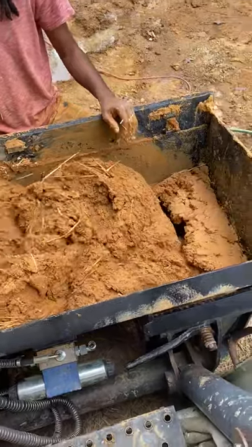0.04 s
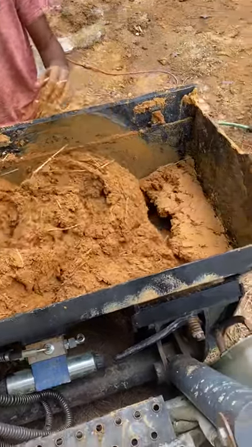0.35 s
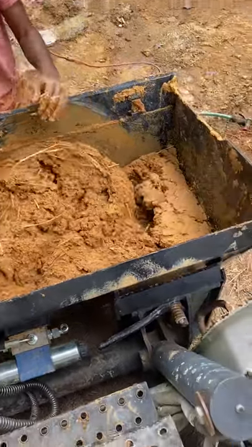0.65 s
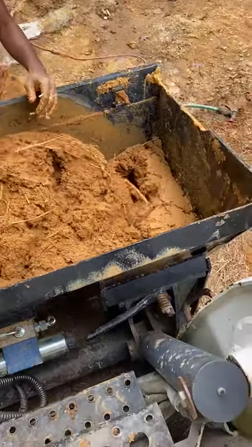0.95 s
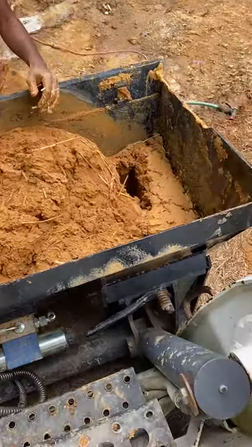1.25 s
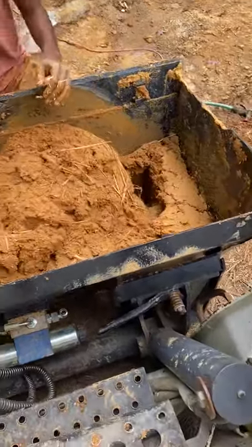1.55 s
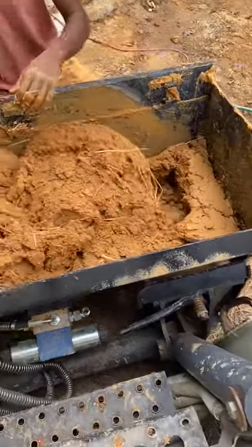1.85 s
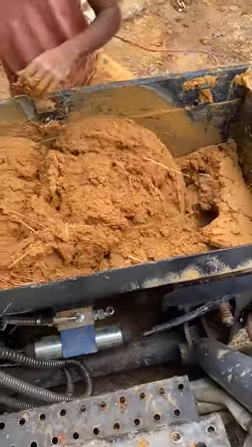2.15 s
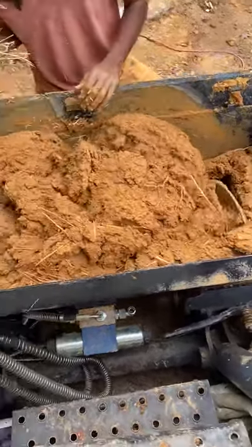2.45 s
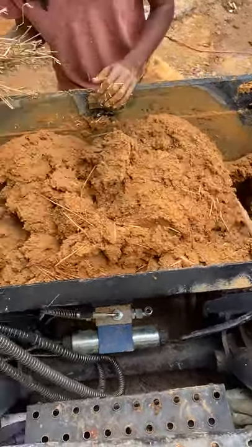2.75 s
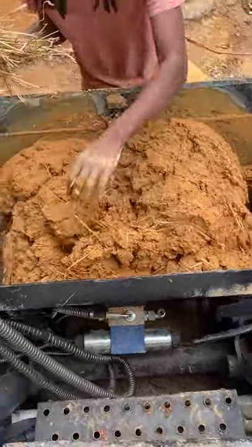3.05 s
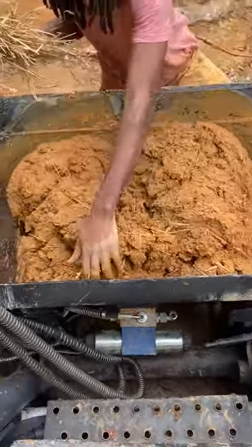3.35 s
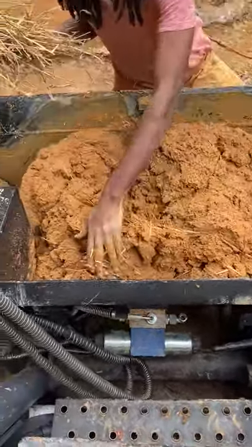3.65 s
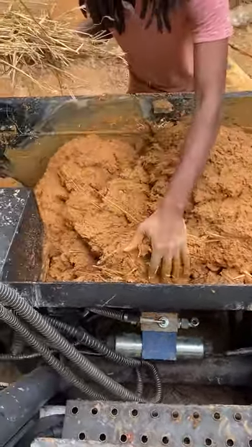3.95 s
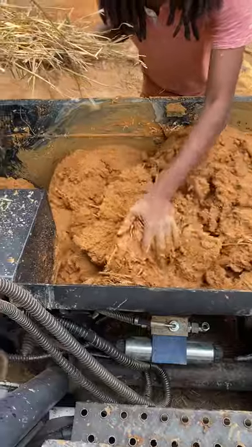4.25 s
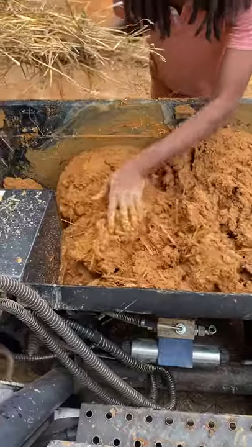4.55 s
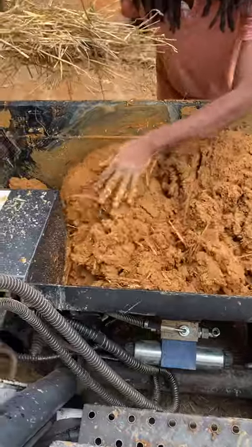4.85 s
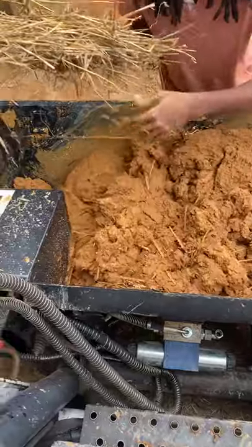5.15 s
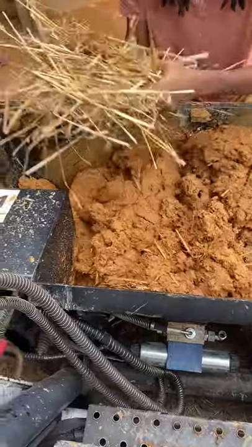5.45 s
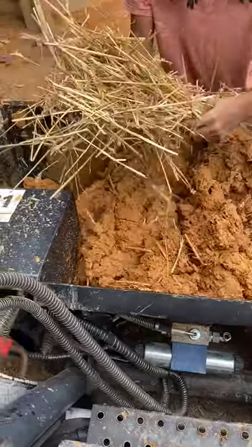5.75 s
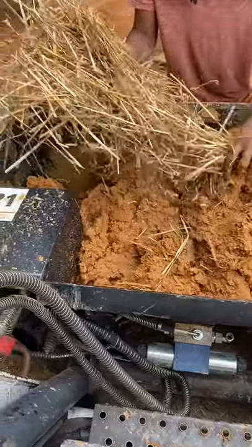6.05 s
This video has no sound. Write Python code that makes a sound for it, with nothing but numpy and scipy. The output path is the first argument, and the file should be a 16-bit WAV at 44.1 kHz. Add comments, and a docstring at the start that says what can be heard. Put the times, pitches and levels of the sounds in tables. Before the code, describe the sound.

Heard up close from the cab of a heavy machine outdoors, a diesel engine drones and rattles without changing speed. The mixer it drives shudders and booms about once a second as it turns heavy clay, most strongly around halfway, followed by a short run of dull knocks on the steel bucket. A wavering pump whine, faintly ringing metal covers and a soft airy hiss continue all the way through.

```python
"""Skid steer mixing wet clay

Outdoors, from the cab, on a phone that swings from the side of the mixer bucket to its middle.
The four-cylinder diesel holds about 1500 rpm: firings throb and rumble in the exhaust, the block
clatters, the steel covers ring. Cooling fan and hydraulic pump whine over a rush of air, and the
steel bucket booms each time the paddles take up load."""
import sys
import numpy as np
from scipy import signal
from scipy.fft import rfft, irfft
from scipy.io import wavfile
from scipy.ndimage import uniform_filter1d, minimum_filter1d

SR = 44100
rng = np.random.default_rng(int(sys.argv[2]) if len(sys.argv) > 2 else 0)


def dump(signal):
    """Clip the signal to [-1, 1] and save it as 16-bit WAV at the path in sys.argv[1]."""
    limited = np.clip(np.atleast_2d(signal).T, -1, 1)
    pcm = np.round(limited * 32767).astype(np.int16)
    wavfile.write(sys.argv[1], SR, pcm)


N = 273861
T = np.arange(N) / SR
BINS = np.arange(N // 2 + 1) * SR / N + 0.00074  # Hz, kept off zero for the logarithm

FIRING_HZ = 50.21  # two firings to a turn of the crankshaft
FAN_RATIO, PUMP_RATIO = .723654, 5.8083  # fan turns and pump strokes per firing
IN_STEP_AGO_S = 2.65  # engine, fan and pump were in step this long ago; sets when their beats swell
SWING_START_S, SWING_END_S = 0.97, 3.6

# rush of air and oil, before its gain: f/Hz, density/(dB per Hz)
AIR_SPECTRUM = [(300, -80), (1300, -73), (2650, -67.5), (3100, -71.5), (3700, -70.8), (4100, -71.6),
                (4600, -70.7), (5200, -71.8), (5600, -74), (6500, -73.9), (7100, -78.8), (8100, -78.2),
                (9000, -79.4), (10600, -80.1), (11600, -78.3), (12200, -79.2), (13600, -84.7),
                (15600, -83.3)]
# faint whistles in the hiss: middle t/s, half length/s, f/Hz, width/Hz, level/dB
AIR_WHISTLES = [(1.05, .45, 10100, 200, -51.5), (1.15, .55, 8570, 200, -52.5), (1.1, 1.2, 3750, 450, -46.5),
                (2.25, .3, 5250, 450, -48.5), (2.2, .22, 9150, 250, -54.5), (2.55, .3, 12100, 250, -54.5),
                (3.3, .6, 11470, 140, -53.5), (3.2, .45, 3710, 80, -49), (3.35, .52, 5150, 130, -49.5),
                (3.0, .25, 8060, 150, -55), (3.05, .25, 10080, 150, -56), (3.95, .25, 10820, 250, -54),
                (5.3, .9, 6210, 140, -52), (5.9, .55, 10150, 220, -54.5), (6.1, .3, 11880, 200, -54)]
# modes of the steel covers: f/Hz, level/dB, loudest t/s, half length/s, left minus right/dB
COVER_RINGS = [(697, -41.5, 1.9, 0.92, 14), (842, -39, 4.1, 1.4, 12), (1274, -48, 0.98, 1.7, 4),
               (1457, -42, 1, 0.81, 5), (1550, -46.5, 2.6, .8, 13), (1747, -42.5, 0.74, 0.72, -1),
               (1951, -43.5, 6, 10, -2), (2150, -44, 4.5, 2.2, -2), (2370, -43, 3.3, 0.99, -1),
               (2498, -45.5, 1.8, 1.3, -11), (2785, -46, 4.1, 1.6, -2), (3120, -55, 1, 1.2, -2)]
# the fan's blade tone and its octave: multiple of the blade rate, level/dB before and after the swing
BLADE_TONES = [(1, -29, -34.5), (2, -31, -36.5)]
# weaker tones of the unevenly spaced blades: multiple of the fan shaft rate, level/dB
FAN_SHAFT_TONES = [(2, -34.5), (6, -36), (7, -45), (8, -44.5), (16, -36), (20, -44), (22, -52), (26, -40.5)]
# the pump's hum: t/s, level/dB
PUMP_LEVELS = [(0, -38), (.6, -32), (1.2, -34.5), (1.7, -25), (2.1, -33), (2.6, -23.5), (3.1, -31.5),
               (3.9, -22), (4.7, -26.5), (5.6, -20.5), (6.2, -27)]
# the pump's overtones: multiple of the stroke rate, level/dB before and after the swing
PUMP_OVERTONES = [(2, -37, -35), (3, -27, -38.5)]
# clatter of the engine block: f/Hz, density/(dB per Hz)
BLOCK_SPECTRUM = [(200, -65.5), (380, -53.5), (600, -53.5), (730, -51), (800, -54.5), (865, -52),
                  (930, -59), (1030, -57.5), (1120, -62), (1480, -62.5), (1680, -66), (2400, -68),
                  (3100, -74), (9000, -105)]
# exhaust rumble, before its gain: f/Hz, density/(dB per Hz)
EXHAUST_SPECTRUM = [(20, -88), (35, -73), (60, -52.5), (80, -45), (110, -47.5), (138, -44.5), (157, -48),
                    (185, -44), (215, -46), (238, -50), (260, -46), (300, -46.5), (335, -57.5), (600, -69),
                    (2000, -120)]
# slow drift of the rumble: t/s, gain/dB
RUMBLE_GAINS = [(0, 2.5), (2.4, 1), (3.5, 1.5), (4.4, -0.1), (5.3, 0.5), (6.2, 0.5)]
# engine tones: multiple of the four-firing cycle rate, level/dB
ENGINE_TONES = [(4, -19.5), (8, -22.5), (9, -48), (12, -37.5), (13, -37.5), (16, -30), (20, -41), (44, -46),
                (48, -38.5), (52, -40.5), (64, -44), (76, -53), (80, -52), (84, -50)]
# dull knocks on the bucket: t/s, f/Hz, level/dB
BUCKET_KNOCKS = [(3.704, 165, -9.5), (3.971, 705, -14), (4.131, 790, -8.5), (4.229, 580, -10)]
# high whines of the mixer drive and the hydraulic pump: f/Hz, level/dB
HIGH_WHINES = [(844, -48.5), (1749, -51.5), (2100, -52)]
# low hum of the mixer drive: t/s, level/dB
DRIVE_LEVELS = [(0, -28), (.35, -32), (1.1, -56), (2.3, -28), (2.8, -37), (3.8, -27), (4.1, -38),
                (4.8, -41), (5.25, -26), (5.6, -44), (6.2, -38)]
# paddles digging into the clay, with lighter catches between: full load t/s, half length/s, level/dB
PADDLE_LOADS = [(.3, 0.33, -17.3), (1.16, 0.11, -18.5), (1.89, 0.42, -16.7), (3.26, 0.24, -12.5),
                (3.7, .17, -21.5), (4.22, .06, -20), (4.84, 0.33, -16), (6.2, 0.17, -14.5)]
# the machine at the phone's two microphones: f/Hz, likeness (0-1), left minus right/dB
MACHINE_AT_MICS = [(100, 1, 0), (170, .999, .1), (330, .97, .9), (600, .92, .5), (940, .87, 2),
                   (1400, .66, 2.8), (1900, .8, -1), (2400, .55, -2), (4400, .3, -1)]
# the hiss at the two microphones: f/Hz, likeness (0-1), left minus right/dB, lag on the right/s
HISS_AT_MICS = [(3000, .65, -1, .00019), (3600, .75, -1, .00029), (4500, .65, -2, .00026),
                (5100, .8, 0, .00021), (7000, .9, 0, .00021), (9000, .82, 0, .000195),
                (15000, .8, 0, .000185)]


def undb(db):
    """Decibels to gain."""
    return 10 ** (np.asarray(db) / 20)


def over_time(table):
    """A table's level, joined by straight lines in time."""
    return np.interp(T, *np.transpose(table))


def over_bins(table):
    """Each column of a table, joined by straight lines in log frequency."""
    hz, *columns = np.transpose(table)
    return [np.interp(np.log(BINS), np.log(hz), column) for column in columns]


def swing(before_db, after_db):
    """A level that glides from one value to another while the phone swings round."""
    return np.interp(T, [SWING_START_S, SWING_END_S], [before_db, after_db])


def colour(white, spectrum):
    """Give white sound of unit power a spectrum in dB per Hz."""
    return irfft(rfft(white) * undb(over_bins(spectrum)[0]) * np.sqrt(SR / 2), N)


def walk(rate_hz):
    """Random drift with unit spread, changing about rate_hz times a second."""
    drift = irfft(rfft(rng.standard_normal(N)) * np.exp(-(BINS / rate_hz) ** 2), N)
    return (drift - drift.mean()) / drift.std()


def tone(cycles, db, waver):
    """A sine at an rms level; moving air and uneven running make it waver in size and phase."""
    wobble = 1 + waver * (walk(4.6) + 1j * walk(4.1))
    return np.sqrt(2) * undb(db) * (wobble * np.exp(2j * np.pi * cycles)).imag


def ring(push, hz, width_hz):
    """One mode with steep skirts, ringing under a push, at unit level."""
    mode = irfft(rfft(push) / (1 + 2j * (BINS - hz) / width_hz) ** 2, N)
    return mode / mode.std()


def puffs(cycles, decay_cycles, scatter_db, steady):
    """Noise, direct and scattered, that flares unevenly once a cycle above a steady floor."""
    count = cycles.astype(int)
    size = undb(scatter_db * rng.uniform(-1, 1, 4096))[count]
    envelope = steady + size * np.exp(-(cycles - count) / decay_cycles)
    return rng.standard_normal((2, N)) * envelope / np.sqrt(np.mean(envelope ** 2))


def recurring(firings):
    """Noise, direct and scattered, that is the same in every cycle of four firings."""
    loop = rng.standard_normal((2, int(4 * N / firings[-1])))
    position = firings / 4 % 1
    return loop[:, (position * loop.shape[1]).astype(int)]


def steel_echoes(sound, echo_db=-13, decay_s=.004, places=4):
    """Steel plates nearby add a spray of early echoes, whose colour changes as the phone moves."""
    out = sound
    for place, spray in enumerate(rng.standard_normal((places, 2048))):
        spray = spray * np.exp(-T[:len(spray)] / decay_s)
        echoes = signal.fftconvolve(sound, [spray / np.linalg.norm(spray)])[:, :N]
        nearness = np.sqrt(np.clip(1 - abs(T / T[-1] * (places - 1) - place), 0, 1))
        out = out + undb(echo_db) * nearness * echoes
    return out / np.sqrt(1 + undb(echo_db) ** 2)


def hiss(gain_db=-1.5, flicker_db=0.5):
    """Rushing air and oil, direct and scattered, with a faint whistle now and then."""
    rush = steel_echoes(colour(rng.standard_normal((2, N)), AIR_SPECTRUM))
    direct, scattered = rush * undb(gain_db + swing(0, 0.17) + flicker_db * walk(33))
    for at_s, half_s, hz, width_hz, db in AIR_WHISTLES:
        whistle = ring(rng.standard_normal(N), hz, width_hz)
        direct = direct + undb(db) * np.exp(-((T - at_s) / half_s) ** 4) * whistle
    return direct, scattered


def covers(firings, far_db=-7, width_hz=95):
    """Firings tap the steel covers; each mode stands out while the phone passes its lobe."""
    taps = puffs(firings, decay_cycles=0.37, scatter_db=4.5, steady=0.69)[0]
    out = 0
    for hz, db, at_s, half_s, pan_db in COVER_RINGS:
        lobe = undb(far_db) + (1 - undb(far_db)) * np.exp(-((T - at_s) / half_s) ** 2)
        pan = undb([[pan_db / 2], [-pan_db / 2]])
        out = out + undb(db) * lobe * ring(taps, hz, width_hz) * pan
    return out


def fan(fan_turns, blades=9):
    """The blades chop the air; their uneven spacing adds other shaft orders."""
    passes = blades * fan_turns
    strong = sum(tone(k * passes, swing(*levels), waver=0.033) for k, *levels in BLADE_TONES)
    weak = sum(tone(k * fan_turns, db, waver=0.08) for k, db in FAN_SHAFT_TONES)
    return strong + weak


def pump(strokes):
    """The hydraulic pump hums at its stroke rate; its top overtone fades as the phone swings."""
    hum = tone(strokes, over_time(PUMP_LEVELS), waver=0.055)
    overtones = sum(tone(k * strokes, swing(*levels), waver=0.04) for k, *levels in PUMP_OVERTONES)
    return hum + overtones


def block_clatter(firings, fan_turns, chatter_share=0.2, flicker_db=0.31):
    """The block knocks with each firing and its covers rattle twice a fan turn."""
    knock = puffs(firings, decay_cycles=0.38, scatter_db=5, steady=1.4)
    rattle = puffs(2 * fan_turns, decay_cycles=0.96, scatter_db=5, steady=1.1)
    chatter = recurring(firings)  # valves and gears
    mix = np.sqrt((1 - chatter_share) / 2) * (knock + rattle) + np.sqrt(chatter_share) * chatter
    return colour(mix, BLOCK_SPECTRUM) * undb(flicker_db * walk(29))


def exhaust(firings, recurring_share=.07):
    """Each firing sends a puff down the pipe; part of the rumble recurs in every cycle of four."""
    gas = puffs(firings, decay_cycles=0.93, scatter_db=0.5, steady=1.0)
    mix = np.sqrt(1 - recurring_share) * gas + np.sqrt(recurring_share) * recurring(firings)
    return colour(mix, EXHAUST_SPECTRUM) * undb(over_time(RUMBLE_GAINS))


def engine_throb(firings):
    """The firings make a firm low throb; the higher orders waver more."""
    out = 0
    for order, db in ENGINE_TONES:
        per_firing = order / 4
        out = out + tone(per_firing * firings, db, waver=min(0.015 * per_firing ** 2, .4))
    return out


def bucket_knocks(decay_cycles=2.4, upper_ratio=1.2, upper_db=-7):
    """Lumps and loose parts strike the bucket; the clay damps each blow within a few cycles."""
    out = 0
    for at_s, hz, db in BUCKET_KNOCKS:
        cycles = hz * np.maximum(T - at_s, 0)
        modes = np.sin(2 * np.pi * cycles) + undb(upper_db) * np.sin(2 * np.pi * upper_ratio * cycles)
        out = out - undb(db) * np.exp(-cycles / decay_cycles) * modes
    return out


def drive_jolts(first_s=.016, every_s=.0997, half_s=0.027, slack_db=-28, scatter_db=.7):
    """The drive jolts the bucket: each jolt is a short swell, as strong as the load on the paddles."""
    times = np.arange(first_s, T[-1] + every_s, every_s)
    load = sum(undb(db) * np.exp(-((times - at_s) / dig_s) ** 4) for at_s, dig_s, db in PADDLE_LOADS)
    sizes = np.maximum(load, undb(slack_db)) * undb(scatter_db * rng.standard_normal(len(times)))
    return sum(size * np.exp(-((T - at_s) / half_s) ** 2) for at_s, size in zip(times, sizes))


def mixer(boom_hz=209.8, held_share=0.22, panel_hz=207, width_hz=30, shudder_db=-34, hum_hz=140.3):
    """The drive shakes the bucket near its panel resonance; dragging clay makes it throb and shudder."""
    throbs = drive_jolts()
    held = uniform_filter1d(throbs, size=SR // 5)  # the panel keeps humming between throbs
    swell = (1 - held_share) * throbs + held_share * held
    boom = swell * tone(boom_hz * T, 0, waver=0.08)
    resonance = 1 / (1 + (2 * (BINS - panel_hz) / width_hz) ** 2)
    shudder = irfft(rfft(rng.standard_normal(N)) * resonance, N)
    whine = sum(tone(hz * T, db, waver=0.35) for hz, db in HIGH_WHINES)
    hum = tone(hum_hz * T, over_time(DRIVE_LEVELS), waver=0.15)
    return boom + undb(shudder_db) * shudder / shudder.std() + whine + hum


def microphones(direct, scattered, likeness, pan_db, lag_s=0):
    """Bass reaches both microphones alike; treble, scattered by the machine, differs between them."""
    shared = rfft(direct) * np.sqrt((1 + likeness) / 2)
    apart = rfft(scattered) * np.sqrt((1 - likeness) / 2)
    left = (shared + apart) * undb(pan_db / 2)
    right = (shared - apart) * undb(-pan_db / 2) * np.exp(-2j * np.pi * BINS * lag_s)
    return irfft(np.array([left, right]), N)


def scene():
    """From the cab: rumble, clatter, tones and the booming bucket, with the hiss off to the left."""
    firing_hz = FIRING_HZ * (1 + .0005 * walk(0.91))
    firings = FIRING_HZ * IN_STEP_AGO_S + np.cumsum(firing_hz) / SR
    fan_turns = FAN_RATIO * firings
    direct, scattered = exhaust(firings) + block_clatter(firings, fan_turns)
    tones = engine_throb(firings) + fan(fan_turns) + pump(PUMP_RATIO * firings)
    bucket = mixer() + bucket_knocks()
    machine = microphones(direct + tones + bucket, scattered, *over_bins(MACHINE_AT_MICS))
    ringing = covers(firings)
    air = microphones(*hiss(), *over_bins(HISS_AT_MICS))
    return machine + ringing + air


def record(dry, ceiling_db=-2.4, hold_s=.008, fade_s=.003, top_hz=15750):
    """The phone smoothly limits the peaks and cuts the top of the treble; both ends fade briefly."""
    hold = int(hold_s * SR)
    headroom = np.minimum(1, undb(ceiling_db) / (np.abs(dry).max(axis=0) + 1e-9))
    gain = uniform_filter1d(minimum_filter1d(headroom, size=hold), size=hold)
    fade = np.clip(np.minimum(T, T[-1] - T) / fade_s, 0, 1)
    lowpass = signal.ellip(10, .1, 80, top_hz, fs=SR, output="sos")
    return signal.sosfilt(lowpass, dry * gain * fade)


dry = scene()
out = record(dry)
dump(out)
```